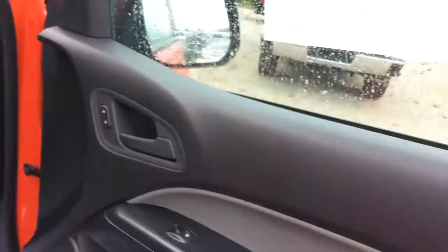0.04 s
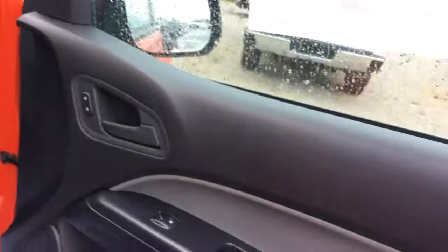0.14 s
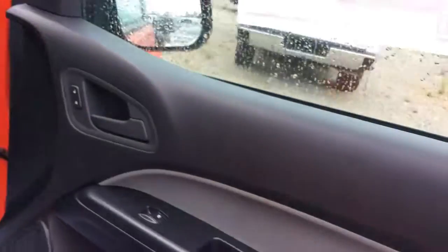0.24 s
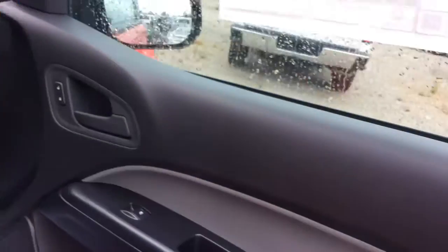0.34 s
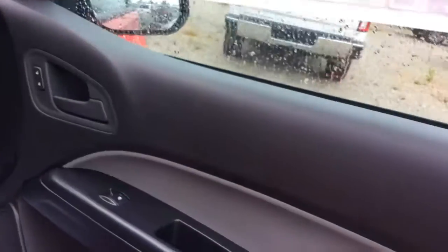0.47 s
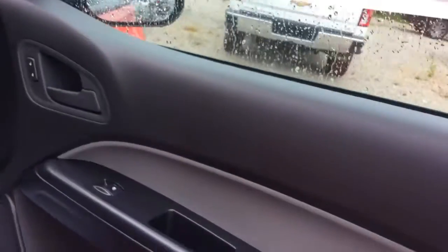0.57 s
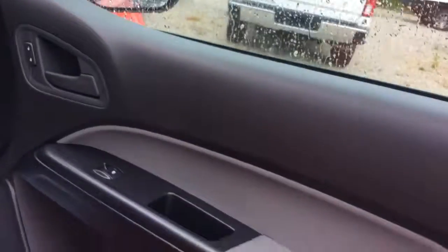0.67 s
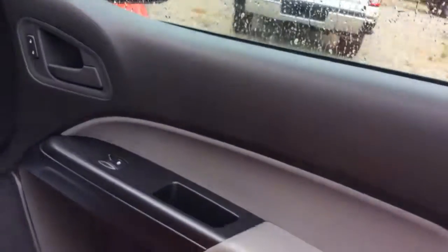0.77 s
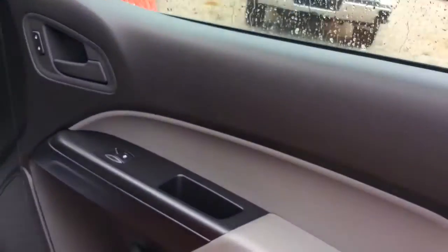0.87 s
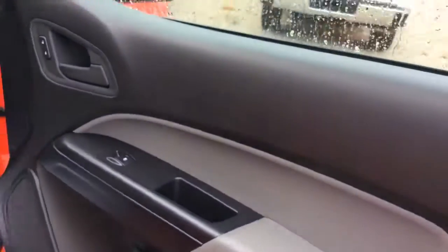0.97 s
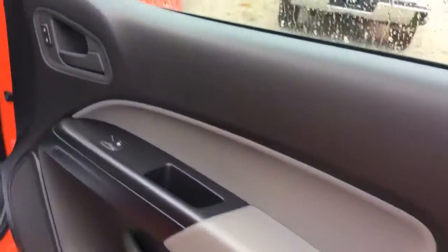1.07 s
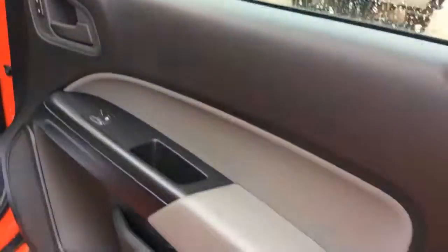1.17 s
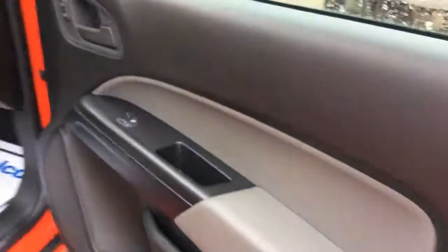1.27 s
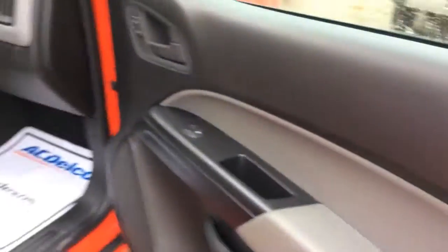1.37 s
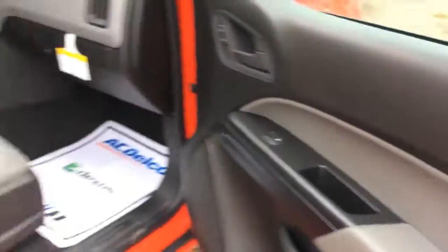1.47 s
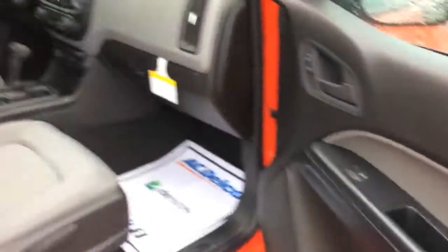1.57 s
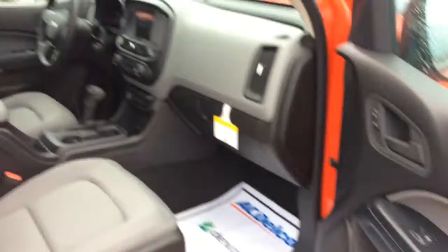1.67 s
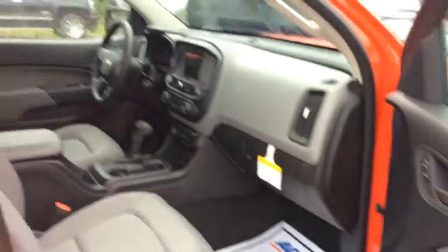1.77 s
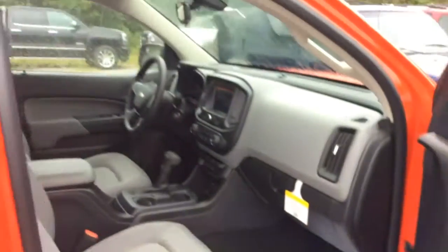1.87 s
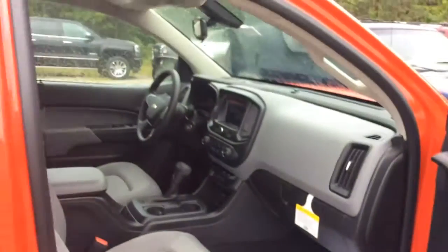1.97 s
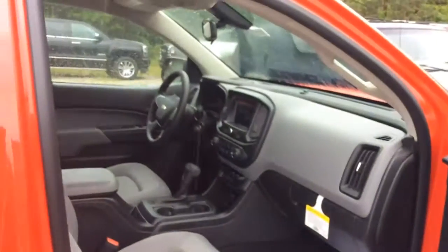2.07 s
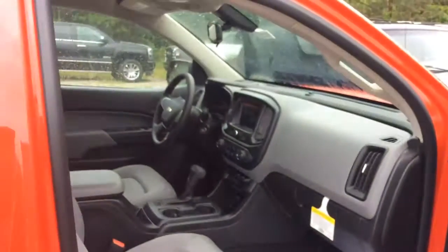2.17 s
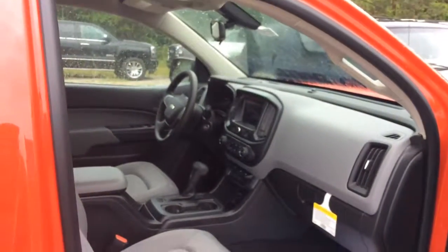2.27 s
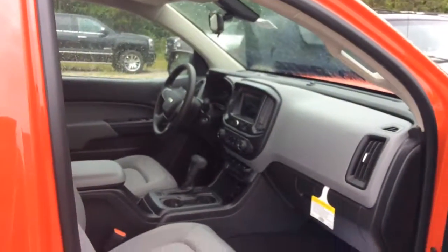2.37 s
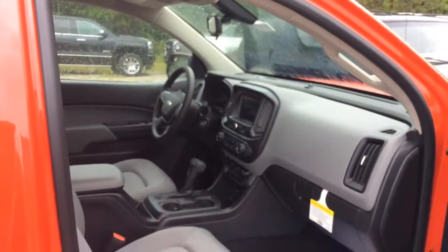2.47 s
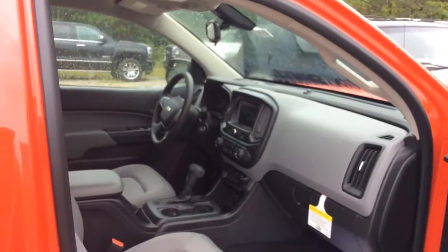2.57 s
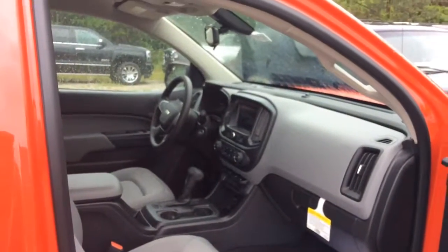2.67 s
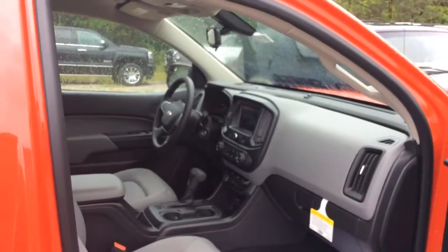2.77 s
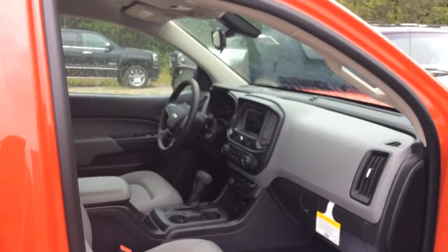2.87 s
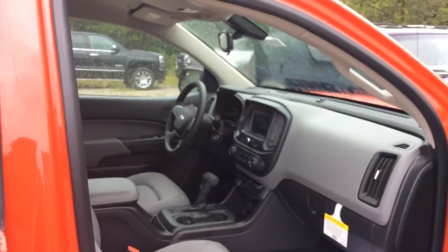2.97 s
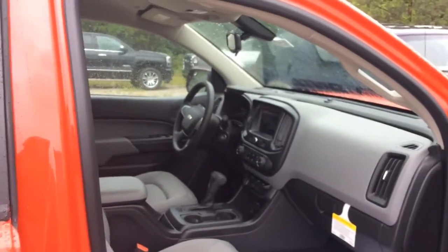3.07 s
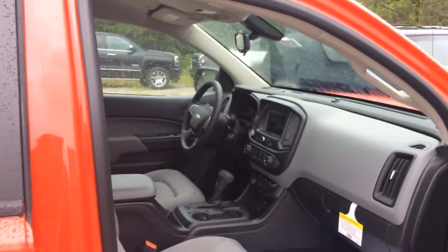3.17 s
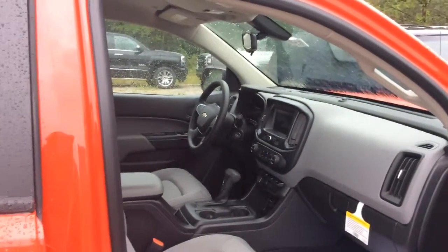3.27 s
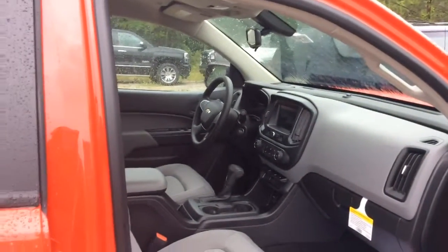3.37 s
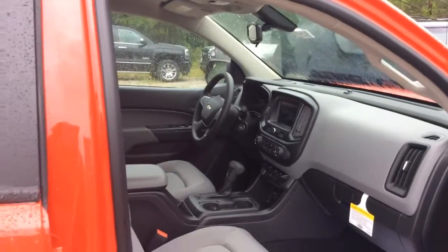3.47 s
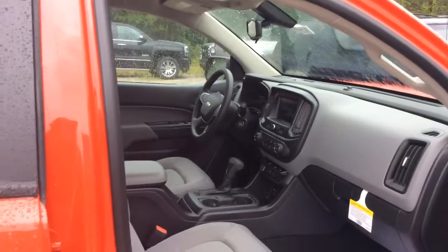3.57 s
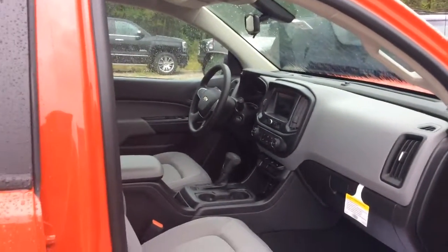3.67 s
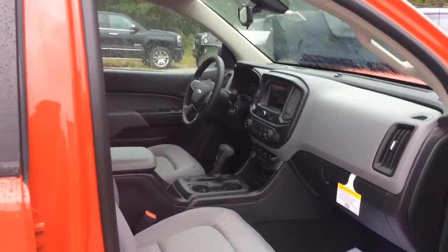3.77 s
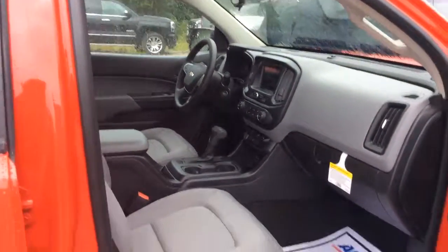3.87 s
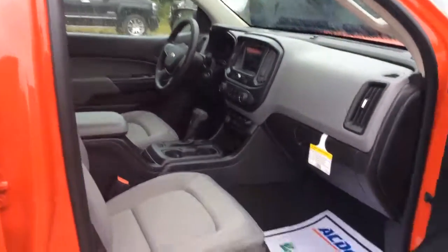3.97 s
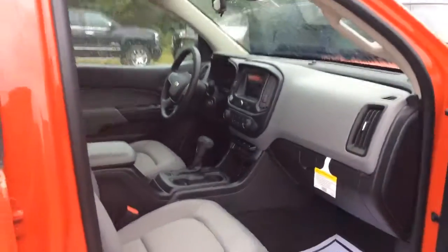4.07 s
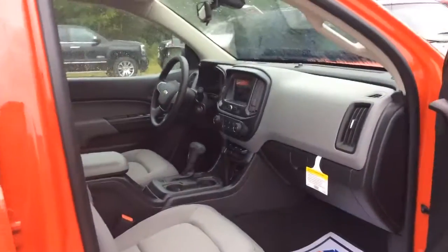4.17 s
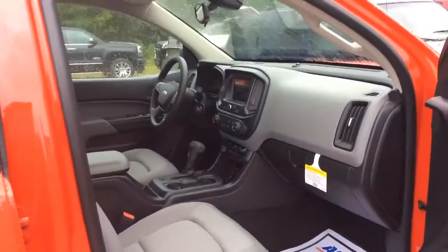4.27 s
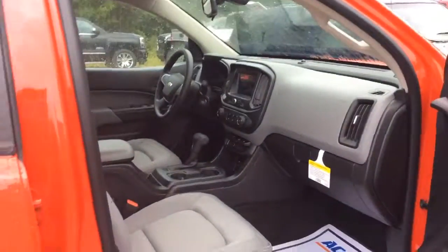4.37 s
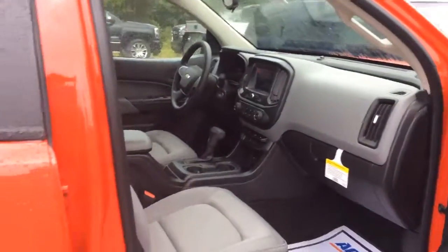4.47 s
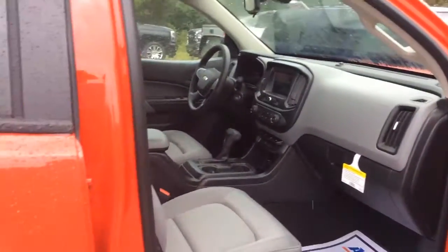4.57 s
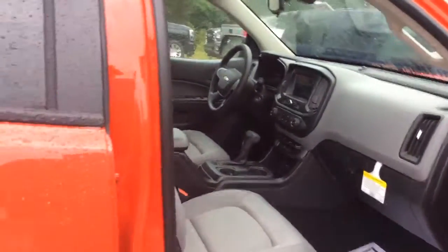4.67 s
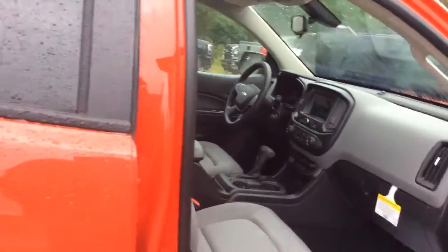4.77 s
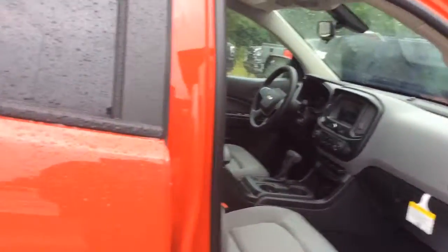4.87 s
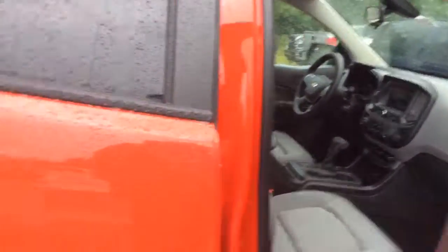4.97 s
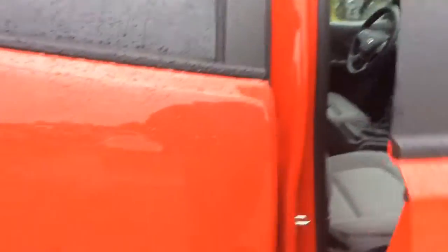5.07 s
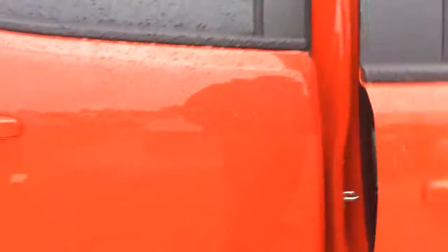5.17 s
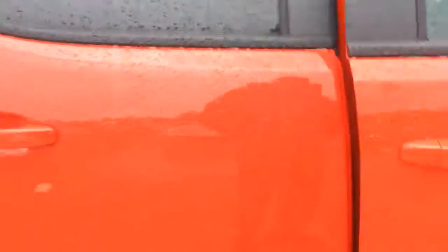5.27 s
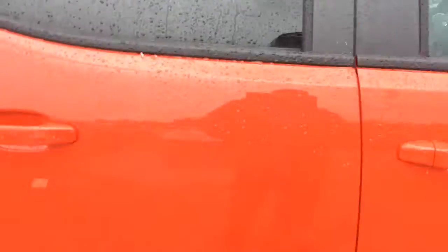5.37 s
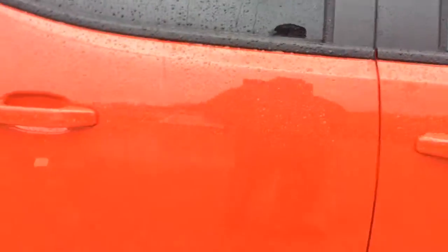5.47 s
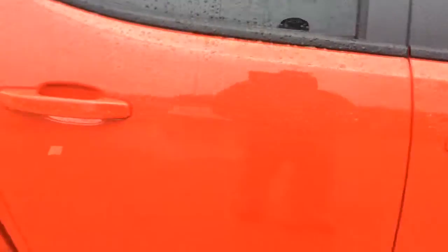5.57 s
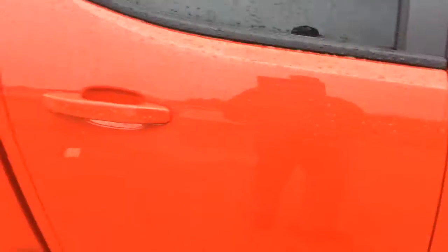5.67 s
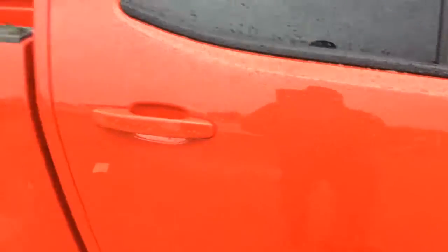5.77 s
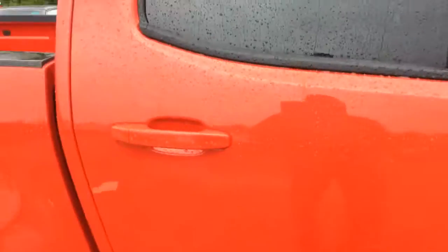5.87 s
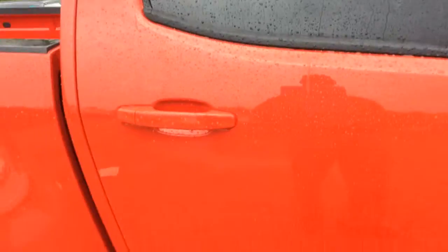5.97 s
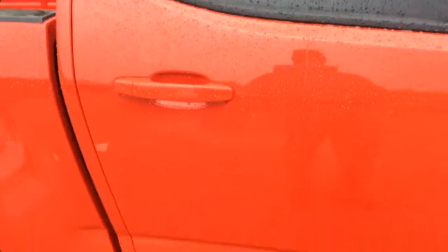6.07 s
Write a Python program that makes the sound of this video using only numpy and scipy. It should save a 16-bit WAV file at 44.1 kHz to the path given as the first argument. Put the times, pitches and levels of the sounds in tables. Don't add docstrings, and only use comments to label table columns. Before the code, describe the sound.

Close handheld microphone in an open lot in drizzle, over soft traffic hum and machinery drone. Shoes crunch wet gravel, small stones click, a jacket swishes and raindrops tick on sheet metal. A far bird whistles faintly. The pickup's door strap creaks and drops into its notch, the hinge squeaks, then the door slams with a deep, rounded thud, latch snap and short rattle; a few gravel steps follow.

```python
import sys
import numpy as np
from scipy import signal
from scipy.fft import rfft, irfft
from scipy.io import wavfile
from scipy.ndimage import uniform_filter1d

SR = 44100
rng = np.random.default_rng(int(sys.argv[2]) if len(sys.argv) > 2 else 0)


def field_ratio(decibels):
    return 10 ** (np.asarray(decibels, dtype=float) / 20)


def wrap_up_sound(samples):
    columns = np.atleast_2d(samples).T
    tamed = np.clip(columns, -1, 1)
    steps = np.round(tamed * 32767).astype(np.int16)
    wavfile.write(sys.argv[1], SR, steps)


N = 270333


def evened(x):
    return x / np.sqrt(np.mean(x ** 2) + 1e-20)


def add(mix, s, sound):
    part = mix[round(s * SR):][:len(sound)]
    part += sound[:len(part)]


def colour(x, shape):
    f, db = np.transpose(shape)
    hz = np.fft.rfftfreq(len(x), 1 / SR)
    gain = field_ratio(np.interp(np.log(hz + 1), np.log(f + 1), db, -90, -90))
    return evened(irfft(rfft(x) * gain, len(x)))


def grains(per_s, spread_db, bed):
    size = field_ratio(spread_db * np.minimum(rng.exponential(1, N), 5))
    size = size * (rng.random(N) < per_s / SR)
    return evened(size * rng.standard_normal(N)) + bed * rng.standard_normal(N)


def drift(shape, bins, frames):
    field = uniform_filter1d(rng.standard_normal(shape), bins, 0)
    return evened(uniform_filter1d(field, frames, 1))


def patchy(x, depth_db, frames, bins):
    z = signal.stft(x, SR, nperseg=512)[2]
    z = z * field_ratio(depth_db * drift(z.shape, bins, frames))
    return evened(signal.istft(z, SR, nperseg=512)[1][:N])


def stroke(t, start, hold, rise, fall):
    early, late = (start - t) / rise, (t - start - hold) / fall
    return field_ratio(-60 * np.maximum(np.maximum(early, late), 0))


def effort(idle_db, strokes, rise, fall):
    t = np.arange(0, N + 64, 64) / SR
    power = field_ratio(2 * idle_db)
    for s, hold, db in strokes:
        power = power + (field_ratio(db) * stroke(t, s, hold, rise, fall)) ** 2
    return np.interp(np.arange(N) / SR, t, np.sqrt(power))


def ring(modes, rise):
    t = np.arange(int(SR * max(mode[2] for mode in modes))) / SR
    tones = sum(field_ratio(db - 60 * t / t60) * np.sin(2 * np.pi * hz * t) for hz, db, t60 in modes)
    return (1 - np.exp(-(t / rise) ** 2)) * tones


def glide(notes, wobble, flutter_db):
    out = np.zeros(N)
    for (s, length, start_hz, end_hz, db), noise in zip(notes, rng.standard_normal((len(notes), 2, 4000))):
        u = np.linspace(0, 1, int(length * SR))
        slow = uniform_filter1d(uniform_filter1d(noise, size=40), size=40)
        sway, flutter = evened(slow)[:, :len(u)]
        hz = (start_hz + (end_hz - start_hz) * u) * (1 + wobble * sway)
        tone = np.sin(2 * np.pi * np.cumsum(hz) / SR)
        add(out, s, field_ratio(db + flutter_db * flutter) * tone * np.sin(np.pi * u) ** 1.8)
    return out


def ticks(rows, spread):
    out, t = np.zeros(N), np.arange(4096) / SR
    top = signal.butter(2, 9000, "high", fs=SR)
    for s, db, hz, t60, crack_db in rows:
        puff = rng.standard_normal(len(t)) + 4.8 * (t == 0)
        band = signal.butter(2, [hz / 1.16, hz * 1.15], "band", fs=SR)
        skirt = signal.butter(1, [hz / 2.1, hz * 1.67], "band", fs=SR)
        body = evened(signal.lfilter(*band, puff) + spread * signal.lfilter(*skirt, puff))
        crack = evened(signal.lfilter(*top, puff)) * field_ratio(crack_db - 60 * t / (0.43 * t60))
        tick = (body * field_ratio(-60 * t / t60) + crack) * (1 - np.exp(-t / .0002))
        add(out, s - .0005, field_ratio(db - 0.3) * tick / abs(tick).max())
    return out


def strikes(taps, modes, own_db, own_t60):
    out = np.zeros(N)
    for (s, db, rise, own_hz), detune in zip(taps, rng.uniform(0.937, 1.04, (len(taps), len(modes)))):
        struck = [(hz * d, m - 1.25 * hz * rise, t60) for (hz, m, t60), d in zip(modes, detune)]
        add(out, s, field_ratio(db - 3) * ring(struck + [(own_hz, own_db, own_t60)], rise))
    return out


# (frequency [Hz], density [dB per Hz])
LOT_SPECTRUM = [(15, -53), (25, -23), (49, -6), (107, 0.5), (133, -5), (193, -8.5), (227, -7), (313, -11.5),
                (399, -11), (567, -20.5), (631, -21), (1020, -25), (3000, -34), (8810, -50), (15500, -40)]
# (time [s], level [dB])
LOT_SWELL = [(0., -54), (3.5, -54), (4.37, -57.5), (4.52, -52.5), (5.09, -54), (5.41, -52.5), (5.55, -52.5),
             (6.13, -55.5)]
# (frequency [Hz], width [Hz], level [dB], start [s], end [s])
MACHINERY = [
    (109.3, 6.4, -60, -1., 5.9),
    (149.4, 7.1, -60, 0.4, 1.42),
    (412.3, 26.6, -66.5, -1., 3.93),
    (265.6, 18, -69, -1., 7.),
]


def lot():
    t = np.arange(N) / SR
    z = signal.stft(colour(grains(3000, 1.25, 1.15), LOT_SPECTRUM), SR, nperseg=1024, noverlap=768)[2]
    z = z * field_ratio(1.4 * drift(z.shape, 12, 14))
    wash = signal.istft(z, SR, nperseg=1024, noverlap=768)[1][:N]
    out = wash * field_ratio(np.interp(t, *np.transpose(LOT_SWELL)) - 2.5)
    for hz, width, db, start, end in MACHINERY:
        r = np.exp(-np.pi * width / SR)
        noise = rng.standard_normal(N) + 1j * rng.standard_normal(N)
        slow = signal.lfilter([1], [1, -2 * r, r * r], noise)
        steadied = slow / abs(slow) ** 0.92
        gate = 1 / (1 + np.exp((start - t) / 0.051)) / (1 + np.exp((t - end) / 0.078))
        out += field_ratio(db) * gate * evened((steadied * np.exp(2j * np.pi * hz * t)).real)
    return out


# (time [s], length [s], start pitch [Hz], end pitch [Hz], level [dB])
BIRD_NOTES = [(3.03, .06, 2560, 2600, -71), (3.07, .075, 2550, 2720, -70), (3.262, .03, 2500, 2850, -71),
              (3.275, 0.023, 3100, 3180, -68), (3.338, .03, 2300, 2400, -66), (3.35, .03, 2500, 2720, -69),
              (3.365, .035, 2780, 2930, -68), (3.385, .04, 2930, 2990, -68), (3.445, .03, 2330, 2350, -71),
              (3.57, .026, 3140, 3190, -68), (3.665, .06, 2820, 3080, -67), (3.76, .03, 3180, 3280, -73)]


def bird():
    out = glide(BIRD_NOTES, .004, 1.2)
    t = np.arange(8000) / SR
    echoes = rng.standard_normal(len(t)) * field_ratio(-60 * t / 0.34)
    echoes = echoes / np.linalg.norm(echoes)
    return out + field_ratio(-10.0) * signal.fftconvolve(out, echoes)[:N]


# (time [s], peak level [dB], lowest frequency [Hz])
TINY_DROPS = [(.236, -54, 3000), (.2768, -52, 8000), (.366, -41.5, 3500), (.4414, -46, 5000),
              (.497, -52, 4000), (.684, -52, 6000), (.9248, -47, 7000), (.977, -46, 3500),
              (1.593, -47, 6500), (1.797, -53, 5000), (1.945, -48, 5000), (2.0058, -50, 6000),
              (2.028, -47, 7500), (2.082, -56, 7000), (2.091, -55, 5500), (2.245, -56, 7000),
              (2.2775, -52, 4500), (2.3, -53, 8000), (2.322, -50, 8000), (2.339, -54, 6500),
              (2.423, -57, 6500), (2.476, -54, 7000), (2.582, -57, 6500), (2.659, -57, 5000),
              (2.767, -57, 6000), (2.792, -54, 6000), (2.824, -59, 7000), (3.17, -54, 7500),
              (3.421, -53, 7500), (3.561, -55, 7500), (3.6167, -38.5, 1500), (3.652, -50, 5500),
              (3.773, -51, 4000), (3.851, -52, 3500), (3.939, -53, 8000), (3.997, -46.5, 4500),
              (4.085, -54, 7000), (4.218, -54, 9000), (4.291, -48, 6000)]


def specks():
    out, t = np.zeros(N), np.arange(512) / SR
    for s, db, hz in TINY_DROPS:
        click = (0.38 * rng.standard_normal(len(t)) + (t == 0)) * field_ratio(-60 * t / 0.007)
        click = signal.lfilter(*signal.butter(2, [hz, 12500], "band", fs=SR), click)
        add(out, s, field_ratio(db + 2.0) * click / abs(click).max())
    return out


# (time [s], peak level [dB], ring [Hz])
METAL_DROPS = [(0.097, -50.5, 8560), (.3172, -44, 8300), (.8031, -46, 8700), (1.05, -42, 9400),
               (1.1448, -53, 8080), (1.2425, -37, 8100), (1.283, -35.5, 8600), (1.305, -52, 13000),
               (1.5291, -47, 7950), (1.8951, -54, 12000), (1.987, -51, 8950), (2.029, -55, 9300),
               (2.048, -56, 12500), (2.0694, -53, 13000), (2.153, -52, 8240), (2.492, -51, 8200),
               (2.762, -55, 8600), (2.492, -60, 12500), (3.43, -43.5, 8000), (3.6164, -49, 8700),
               (3.669, -39.5, 9550), (3.706, -49, 9350), (3.852, -53, 9000), (4.305, -46.5, 8160)]


def drops():
    t60_s, crack_db = 0.035, -23
    return ticks([(*row, t60_s, crack_db) for row in METAL_DROPS], spread=.45)


# (frequency [Hz], density [dB per Hz])
CLOTH = [(2350, -9.5), (4000, -11.5), (4450, -9.5), (4850, -8.5), (5340, -4), (6440, -9.5), (8400, 0),
         (14700, -13), (15500, -15)]
# (start [s], moving for [s], level [dB])
CLOTH_MOVES = [(.28, 0.16, -64), (.5, 0.29, -70.5), (.93, 0.065, -59.5), (1.03, 0.36, -68),
               (1.455, 0.0088, -61), (1.6, 0.34, -71), (1.66, 0.017, -59), (3.95, .5, -66.5),
               (4.49, 0.12, -61.5), (4.6, 0.2, -55.5), (4.97, 0.12, -64), (5.45, .3, -67), (5.78, .03, -60),
               (5.85, 0.35, -69)]


def clothes():
    moving = effort(-71.5, CLOTH_MOVES, rise=0.37, fall=0.3)
    return colour(grains(2500, 0.73, 0.95), CLOTH) * moving


# (frequency [Hz], density [dB per Hz])
GRAVEL_GRIT = [(880, -48), (1500, -14), (2660, -5.5), (2860, -4), (3090, -4), (3910, -1), (7120, -5.5),
               (8400, -17), (12000, -42), (15600, -75), (22000, -120)]
# (frequency [Hz], density [dB per Hz])
SOLE_SCRAPE = [(150, -20), (250, -16), (438, -2.5), (507, -7), (574, -2.5), (853, -6), (1070, -3),
               (1920, -11), (3000, -18.5), (3900, -35), (6600, -120)]
# (start [s], pressed for [s], grit level [dB], scrape level [dB])
FOOTSTEPS = [(.254, 0.066, -62, -60.5), (.31, 0.027, -60.5, -61), (.35, 0.037, -51, -57.5),
             (.395, 0.051, -53, -57), (.88, 0.059, -61, -67), (.95, 0.034, -58.5, -62.5),
             (1.0, .42, -64.5, -69), (1.445, 0.0099, -60.5, -59), (1.62, 0.047, -57.5, -57.5),
             (1.664, 0.0051, -54.5, -53.5), (1.73, 0.038, -61.5, -62.5), (3.95, .4, -77, -65),
             (4.6, 0.014, -59, -63.5), (4.67, 0.2, -67.5, -62), (5.034, 0.0064, -60.5, -65.5),
             (5.28, .22, -69, -61.5), (5.69, 0.12, -65.5, -57), (5.85, 0.11, -61.5, -56.5),
             (6.03, .1, -67.5, -61.5)]


def soles():
    rise, fall = 0.073, 0.29
    grit_press = effort(-74, [(s, hold, grit_db) for s, hold, grit_db, _ in FOOTSTEPS], rise, fall)
    scrape_press = effort(-67.5, [(s, hold, scrape_db) for s, hold, _, scrape_db in FOOTSTEPS], rise, fall)
    grit = colour(grains(2000, 1.3, 0.85), GRAVEL_GRIT) * grit_press
    scrape = colour(grains(900, 1.33, 1.0), SOLE_SCRAPE) * scrape_press
    rubbing = grit + scrape
    return patchy(rubbing, 2.53, frames=4, bins=8) * np.std(rubbing)


# (time [s], peak level [dB], ring
# [Hz])
DULL_KNOCKS = [(.254, -46, 800), (.543, -36, 6140), (.777, -45, 1130), (0.7783, -37.5, 8300),
               (0.7788, -40, 5600), (0.835, -49, 1300), (.951, -45, 1550), (.951, -48, 2650),
               (.9755, -50, 950), (.992, -51, 1000), (1.011, -53, 1500), (1.189, -53.5, 1200),
               (1.24, -45, 1240), (1.2804, -45, 1280), (1.312, -50, 1390), (1.345, -49, 1280),
               (1.454, -42, 2030), (.275, -44, 620), (1.664, -35.5, 452), (1.669, -44, 2800),
               (.6395, -35.5, 7600), (1.077, -43, 1340), (1.09, -40, 1160), (1.241, -44, 3860),
               (1.263, -36, 1310), (1.454, -38, 1490), (1.456, -43, 800), (1.612, -39.5, 1040),
               (1.616, -38, 325), (1.65, -41, 363), (1.817, -44, 2160), (3.616, -46.5, 1480),
               (3.617, -53, 2350), (3.617, -56, 3160), (3.676, -44.5, 1790), (4.107, -44, 766),
               (4.673, -44, 2820), (6.0444, -27, 6850), (4.843, -45.5, 1400), (5.266, -39.5, 1500),
               (5.266, -45, 2300), (6.045, -39, 1180), (6.1135, -39, 1230)]


def knocks():
    return ticks([(s, db - 6, hz, 0.021 + 15 / hz, -60) for s, db, hz in DULL_KNOCKS], spread=.12)


# (time [s], peak level [dB], ring [Hz], t60 [s])
STONE_CLICKS = [(0.2536, -46, 4600, .055), (.349, -39, 4000, 0.13), (0.5441, -39, 3730, 0.076),
                (.603, -53, 3500, .028), (.573, -50, 11500, 0.019), (.623, -52, 12500, .03),
                (0.7765, -45.5, 2600, 0.049), (0.8735, -38.5, 5000, 0.045), (.9023, -42.5, 4660, 0.085),
                (0.9888, -42.5, 5700, .034), (1.374, -48, 3970, 0.026), (1.4461, -45.5, 4200, .073),
                (1.614, -36.5, 5110, 0.064), (1.7187, -39, 6100, 0.052), (1.8184, -43, 4240, 0.051),
                (1.943, -46.5, 3370, 0.063), (2.4756, -50, 6530, 0.037), (3.1353, -55, 2700, 0.021),
                (3.5198, -43.5, 5700, .042), (3.9, -54, 4900, .03), (1.738, -47, 5200, .04),
                (1.763, -50, 5000, .03), (1.648, -44, 6500, .05), (.36, -43, 5200, .07),
                (4.845, -46, 7170, .033), (5.034, -47, 7600, 0.057), (5.1933, -49.5, 6860, 0.038),
                (5.4652, -43.5, 3580, .085), (6.0301, -43.5, 5260, 0.093), (6.058, -51, 8500, .02),
                (6.114, -47, 7500, .025)]


def pebbles():
    rows = [(s, db, hz, t60, -28 + 24 * np.log2(hz / 5000)) for s, db, hz, t60 in STONE_CLICKS]
    return ticks(rows, spread=.45)


# (time [s], length [s], start pitch [Hz], end pitch [Hz], level [dB])
STRAP_WHINES = [(3.988, .011, 3200, 3330, -54), (4.0, .009, 6150, 5950, -58),
                (4.011, .014, 3150, 3500, -59), (4.02, 0.021, 3490, 3710, -51),
                (4.022, 0.017, 4000, 4270, -54), (4.036, .014, 3700, 3900, -58),
                (4.02, .028, 2440, 2540, -53), (3.995, .005, 3300, 3300, -47),
                (3.995, .005, 5400, 5400, -55), (4.044, .02, 2300, 2400, -59),
                (4.311, .012, 2170, 2310, -61)]


def strap_whine():
    return glide(STRAP_WHINES, .045, 3.7)


# (time [s], level [dB], own pitch [Hz])
STRAP_SLIPS = [(3.9905, -44, 1500), (3.9934, -37, 1750), (3.9957, -38, 910), (3.9972, -22, 1250),
               (4.0008, -36, 695), (4.004, -42, 1200), (4.008, -40, 1400), (4.011, -42, 1800),
               (4.015, -43, 1000), (4.018, -38, 1900), (4.0203, -33, 1500), (4.0236, -32, 1250),
               (4.027, -36, 1700), (4.0295, -35, 1800), (4.0313, -31, 1290), (4.0345, -36, 1200),
               (4.0376, -29, 1550), (4.0425, -31, 1300), (4.047, -43, 700), (4.052, -42, 1300),
               (4.057, -48, 1600)]
# (frequency [Hz], level [dB], t60 [s])
STRAP_MODES = [(1244, -9, 0.01), (1510, -8, 0.013), (1850, -12, 0.012), (2400, -13.5, 0.013),
               (467, -8.5, 0.027), (764, -13, 0.029)]


def strap_creak():
    jerks = [(s, db, .0005, hz) for s, db, hz in STRAP_SLIPS]
    return strikes(jerks, STRAP_MODES, own_db=7., own_t60=0.0088)


# (time [s], level [dB], landing time [s], own pitch [Hz])
NOTCH_KNOCKS = [
    (4.3055, -32, 0.001, 245),
    (4.3135, -35, 0.003, 330),
    (4.322, -31, 0.0035, 350),
    (4.3305, -39, .004, 440),
    (4.341, -42, 0.004, 400),
    (4.347, -44, .003, 440),
    (4.358, -37, 0.003, 350),
    (4.369, -43, .003, 248),
    (5.265, -33, 0.00092, 300),
]
# (frequency [Hz], level [dB], t60 [s])
PANEL_MODES = [(166, -8, 0.052), (248, 0, 0.07), (287, -4.5, 0.064), (402, -5, 0.08), (558, -5, 0.04),
               (850, -0.5, 0.029), (1650, -9, 0.019), (2500, -20, 0.02)]


def strap_notch():
    return strikes(NOTCH_KNOCKS, PANEL_MODES, own_db=4., own_t60=0.042)


# (multiple of the pitch, level [dB])
HINGE_OVERTONES = [(2, -29.5), (3, -24), (4, -36)]
# (time [s], length [s], level [dB], starting pitch [Hz])
HINGE_SQUEAKS = [
    (4.749, .007, -53, 800),
    (4.755, 0.026, -23.5, 850),
    (4.777, 0.0226, -36.5, 797),
    (4.795, 0.015, -43.5, 800),
    (4.805, .035, -56, 775),
]


def hinge():
    out = np.zeros(N)
    for s, length, db, hz in HINGE_SQUEAKS:
        u = np.linspace(0, 1, int(length * SR))
        wobble = 0.021 * evened(uniform_filter1d(rng.standard_normal(3000), size=60))[:len(u)]
        turn = 2 * np.pi * np.cumsum(hz * (1 - 0.15 * u ** 0.72 + wobble)) / SR
        upper = sum(field_ratio(level_db) * np.sin(k * turn) for k, level_db in HINGE_OVERTONES)
        add(out, s, field_ratio(db) * np.sin(turn) * abs(np.sin(np.pi * u ** 0.91)) ** 1.7)
        add(out, s + 0.0033, field_ratio(db) * upper * np.sin(np.pi * u))
    return out


# (frequency [Hz], density [dB per Hz])
SHEET_METAL = [(560, 3.5), (950, -4), (1190, -2), (1280, -0.5), (1590, -4.5), (1960, -4.5), (2500, -8.5),
               (2690, -13), (2930, -16), (3160, -15), (5000, -32), (6500, -50), (11000, -120)]
# (frequency [Hz], density [dB per Hz])
LATCH_FIZZ = [(2060, 5), (3500, 0), (4300, -3), (4840, -4.5), (5380, -3), (6650, -9), (8370, -3),
              (11900, -12.5), (14300, -18), (15500, -25)]
# (time [s], sheet level [dB], fizz level [dB], 60 dB build-up [s])
SLAM_JOLTS = [(5.346, -40, -60, .03), (5.351, -31, -54, .025), (5.3595, -21.5, -33, 0.008),
              (5.3645, -28, -25, 0.016), (5.369, -42, -29.5, 0.0324), (5.378, -46, -41, 0.06),
              (5.389, -28.5, -38.5, 0.06), (5.396, -32.5, -43, 0.04), (5.411, -43, -52, 0.04),
              (5.419, -43, -58, .03), (5.427, -51.5, -59, .02), (5.438, -51, -64, 0), (5.462, -64, -70, .3)]


def rattle():
    t, sheet_power, fizz_power = np.arange(0, N, 16) / SR, 0, 0
    for s, sheet_db, fizz_db, rise in SLAM_JOLTS:
        snap = stroke(t, s, 0, rise, 0.034)
        shiver = field_ratio(-8.5) * stroke(t, s, 0, rise, 0.15)
        sheet_power = sheet_power + (field_ratio(sheet_db) * np.maximum(snap, shiver)) ** 2
        fizz_power = fizz_power + (field_ratio(fizz_db) * np.maximum(snap, field_ratio(-3.5) * shiver)) ** 2
    sheet, fizz = (np.interp(np.arange(N) / SR, t, np.sqrt(power)) for power in (sheet_power, fizz_power))
    return colour(grains(4000, 1.6, 1.1), SHEET_METAL) * sheet + colour(grains(8000, 0.9, 1.2), LATCH_FIZZ) * fizz


# (time [s], level [dB], frequency [Hz], t60 [s])
CLAW_RINGS = [(5.314, -45, 497, 0.11), (5.326, -44, 554, 0.15), (5.333, -43, 1860, .06),
              (5.337, -46, 1900, .04), (5.344, -40, 604, .04), (5.3637, -13.5, 558, 0.063),
              (5.36, -23.5, 1184, 0.072), (5.363, -21.5, 1970, 0.038), (5.387, -30, 1253, 0.05),
              (5.389, -36, 2300, .04), (5.389, -40, 8450, .06), (5.394, -42, 8600, .04),
              (5.392, -23, 504, .05), (5.362, -32, 3500, .03), (5.428, -28, 520, 0.043),
              (5.436, -39, 780, .04), (5.462, -30, 331, .08), (5.492, -40, 298, 0.051),
              (5.388, -33, 2920, .04), (5.398, -12.5, 337, 0.057), (5.415, -39, 2630, 0.025),
              (5.424, -18, 343.4, 0.11)]


def claw():
    out = np.zeros(N)
    for s, db, hz, t60 in CLAW_RINGS:
        add(out, s, ring([(hz, db, t60)], 0.00098))
    return out


# (time [s], level [dB], direction, contact time [s])
SLAM_BLOWS = [(5.345, -21.5, 1, 0.0027), (5.3511, -16, -1, 0.0014), (5.356, -13.5, -1, 0.00094),
              (5.358, -14, 1, 0.0023), (5.3595, -10.5, 1, 0.00033), (5.3641, -9, -1, 0.0013),
              (5.366, -12.5, -1, 0.00089), (5.381, -14, 1, 0.0064), (5.387, -5.5, -1, 0.0029),
              (5.393, -17, 1, .002), (5.398, -12, 1, 0.002), (5.405, -28.5, -1, 0.0031),
              (5.423, -11, -1, 0.0026), (5.443, -25, -1, 0.0031), (5.454, -26, -1, 0.0035),
              (5.478, -23, 1, 0.0052), (5.49, -22, 1, 0.0031)]
# (frequency [Hz], level [dB], t60 [s])
DOOR_MODES = [(48, -20, 0.47), (77.8, -6, 0.2), (118, -7, 0.2), (160, -3.5, 0.13), (196.5, -8.5, 0.21),
              (229.6, -7, 0.15), (264, 2.5, 0.058), (341, -3.5, 0.2), (413, -10, 0.14), (488, 5, 0.046),
              (610, -0.5, 0.077), (780, 1.5, 0.078)]


def slam():
    force = np.zeros(N)
    for s, db, direction, contact in SLAM_BLOWS:
        push = np.hanning(int(contact * SR) + 3)
        add(force, s, np.sign(direction) * field_ratio(db) * push / push.sum())
    body = signal.fftconvolve(force, ring(DOOR_MODES, .0001))[:N] * field_ratio(-13.5)
    return body + claw() + rattle()


def scene():
    background = lot() + bird() + specks() + drops()
    person = clothes() + soles() + knocks() + pebbles()
    door = strap_whine() + strap_creak() + strap_notch() + hinge() + slam()
    return (background + person + door)[None]


def roll_off(x):
    return signal.sosfilt(signal.butter(12, 15570, fs=SR, output="sos"), x)


# (frequency [Hz], width [Hz], level [dB])
PORT_RING = (8320, 310, -4.5)


def record(dry):
    hz, width, db = PORT_RING
    x = signal.lfilter(*signal.butter(1, 30, "high", fs=SR), dry)
    x = x + field_ratio(db) * signal.lfilter(*signal.iirpeak(hz, hz / width, SR), x)
    x = signal.oaconvolve(x, signal.firwin(511, 15660, fs=SR)[None], "same")
    return roll_off(x)


dry = scene()
out = record(dry)
wrap_up_sound(out)
```